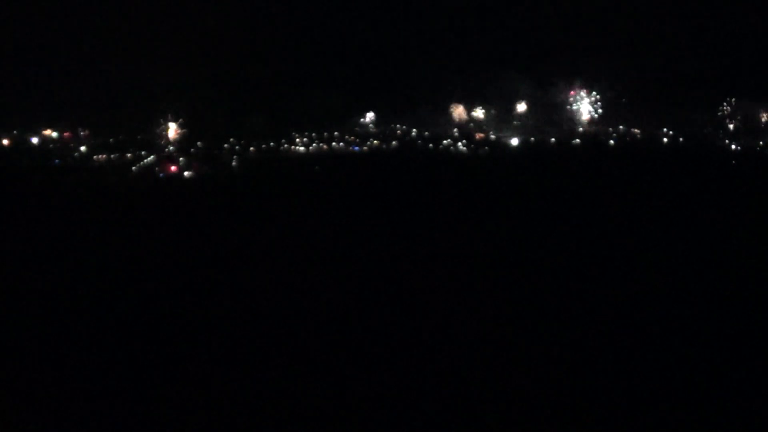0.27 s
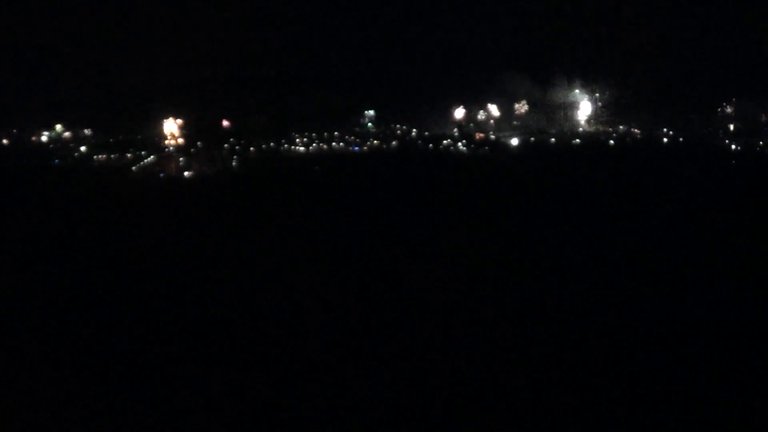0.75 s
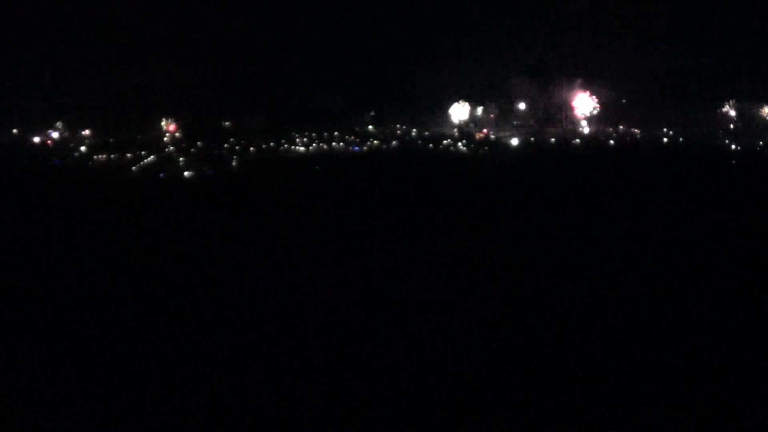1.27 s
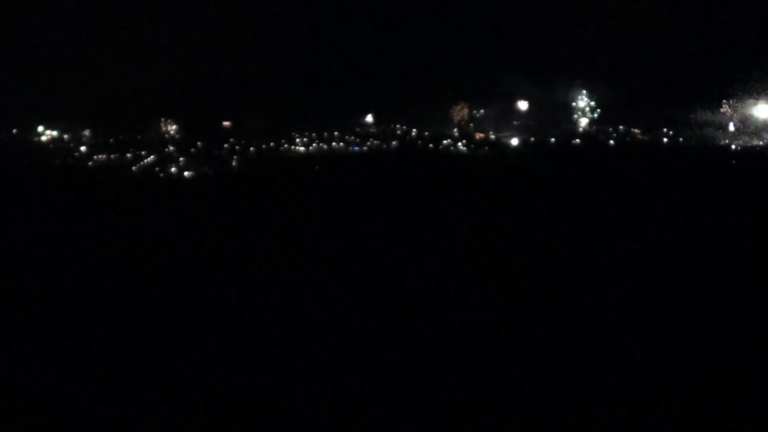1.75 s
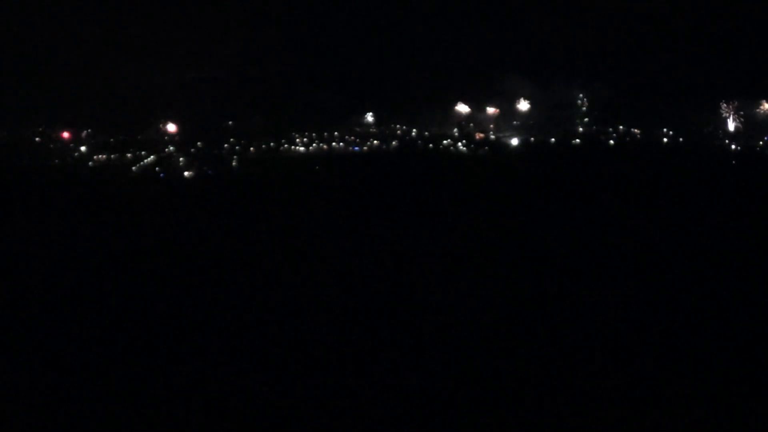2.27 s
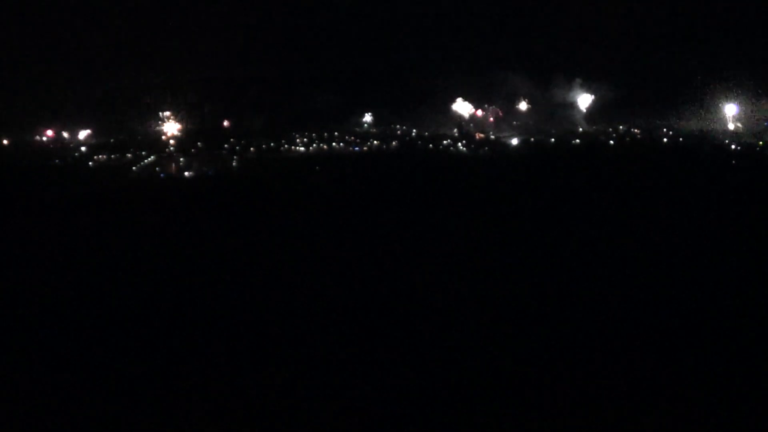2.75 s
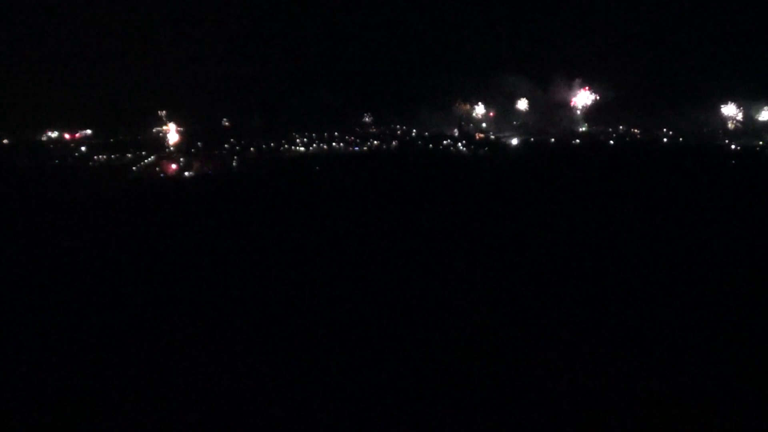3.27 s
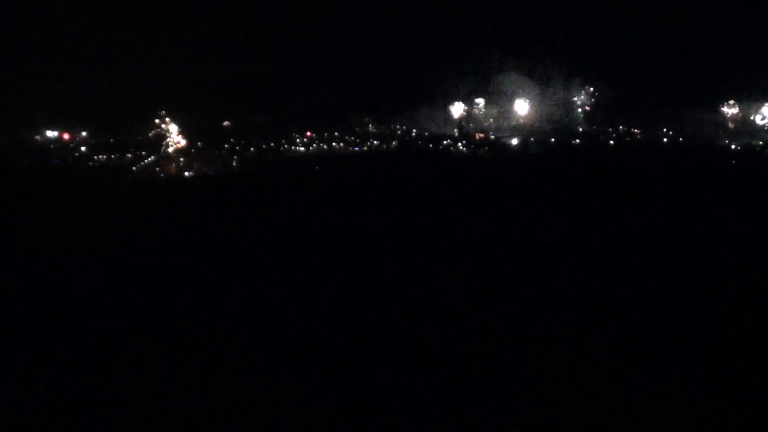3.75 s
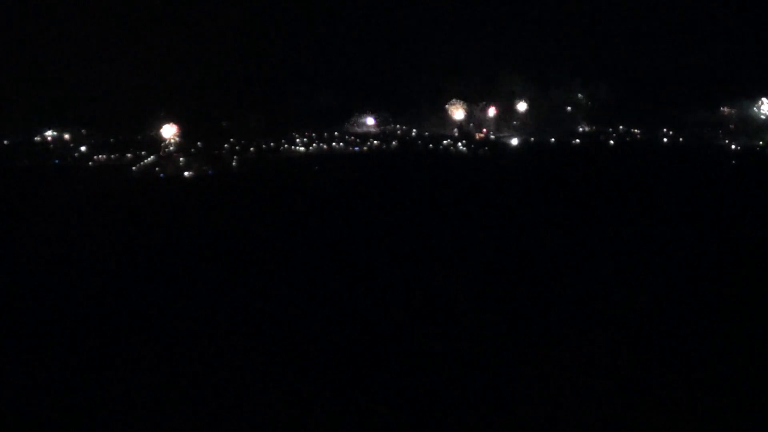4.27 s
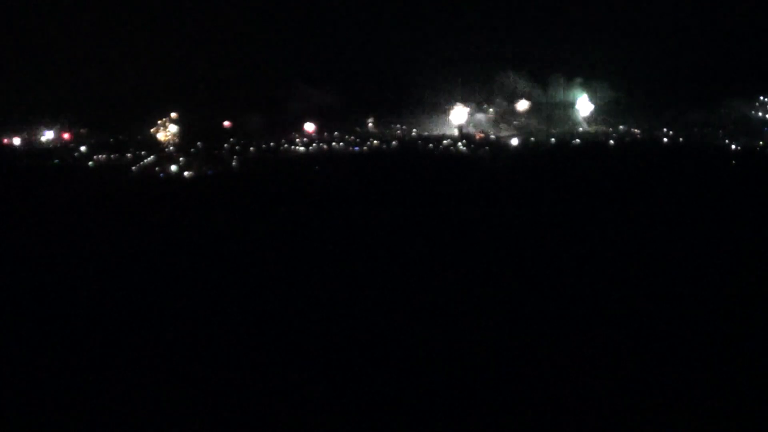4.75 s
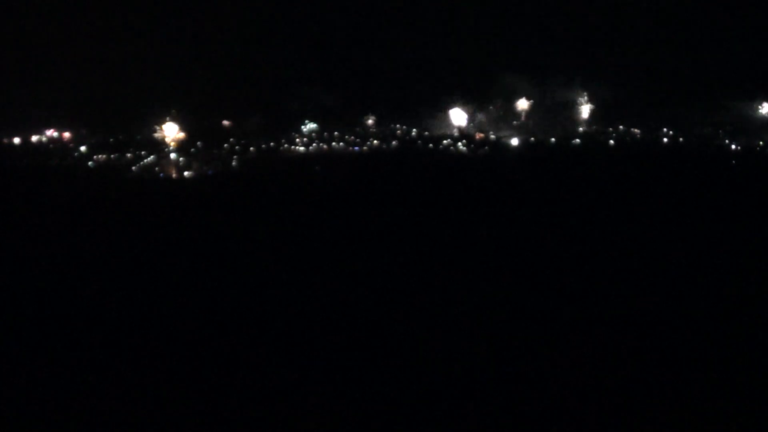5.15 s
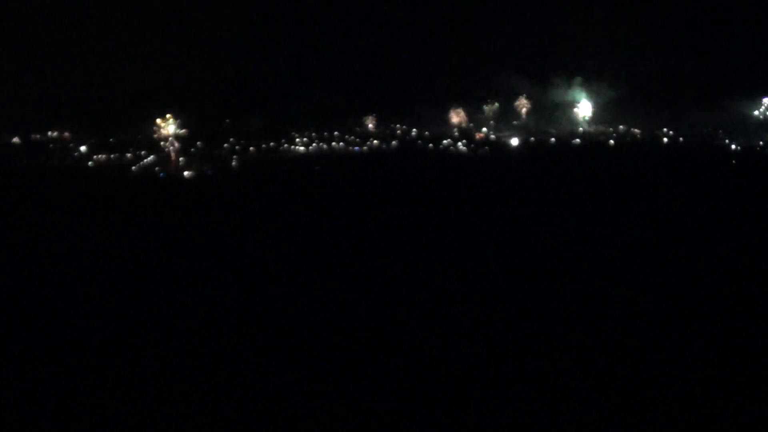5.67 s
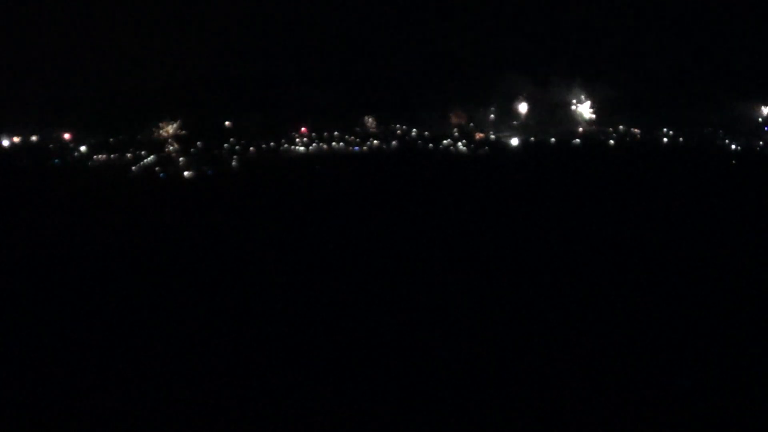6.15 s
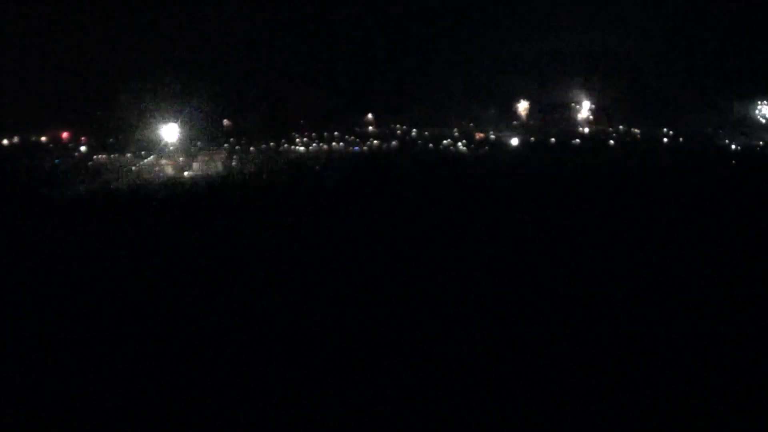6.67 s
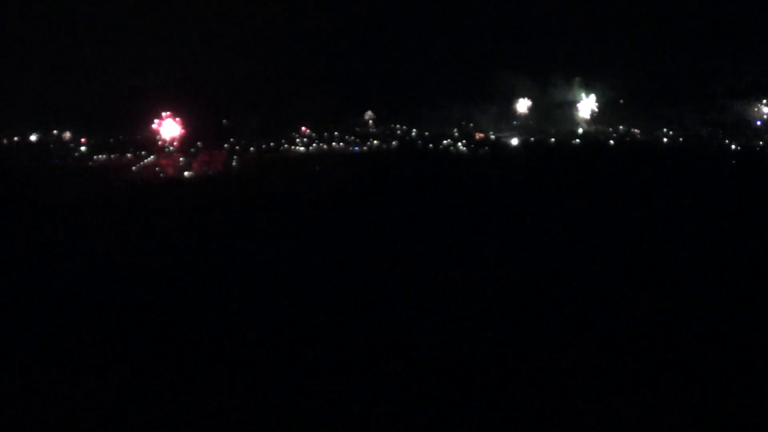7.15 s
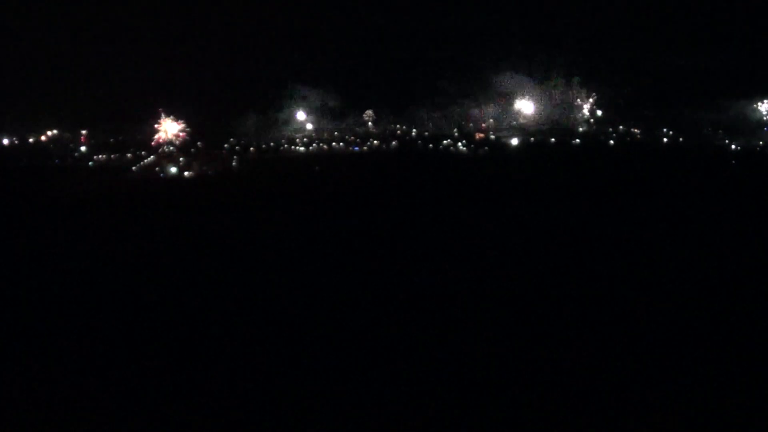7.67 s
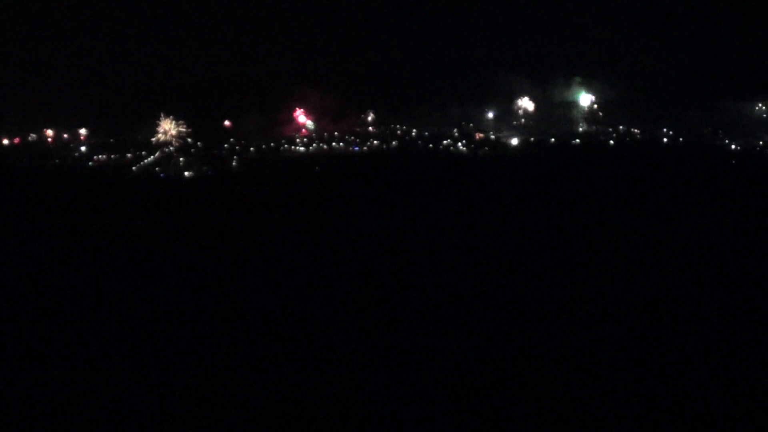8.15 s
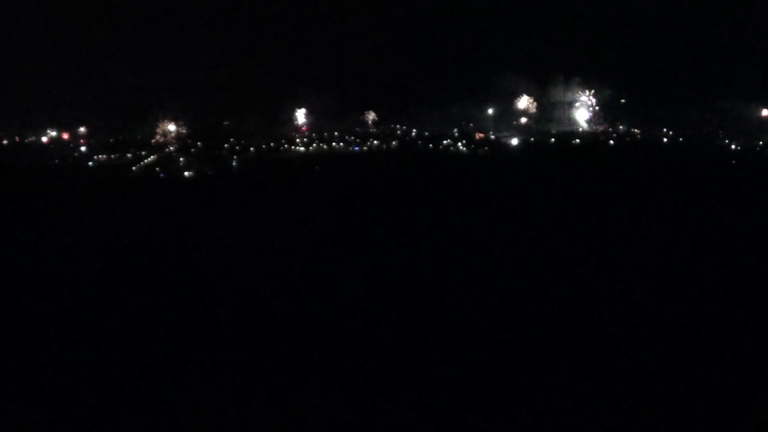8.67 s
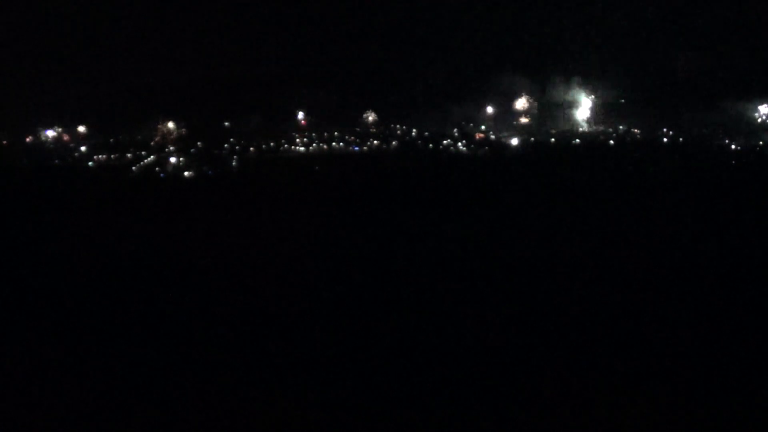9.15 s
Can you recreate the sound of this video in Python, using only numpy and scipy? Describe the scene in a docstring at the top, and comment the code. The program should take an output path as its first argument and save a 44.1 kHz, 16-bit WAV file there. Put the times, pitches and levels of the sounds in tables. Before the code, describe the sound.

Outdoors at night, fireworks go off all over a distant town without pause. Sharp nearer cracks with short, hollow thumps mix with duller thuds from farther off, several dozen every few seconds, irregularly clustered and spread left and right. Brief echoes from ground and walls blur them together. Behind lies a murmur of far pops and patches of crackle. A small stereo camera adds light hiss and a thin high whine, ducking after loud bangs.

```python
"""Bangs of fireworks, each a short crack and a two-cycle thump with echoes, burst all over a distant town.
A pulse with the spectrum of a shock front makes the crack, a windowed cosine the thump, sparse taps the echoes.
Behind them far pops and crackle, swarms of random filtered clicks, merge into a bed.
A small stereo camera adds noise as hiss and a sine as whine; its limiter ducks both after each loud bang."""
import sys
import numpy as np
from scipy import signal
from scipy.fft import next_fast_len
from scipy.io import wavfile

SR = 44100
rng = np.random.default_rng(int(sys.argv[2]) if len(sys.argv) > 2 else 0)


def log_audio(samples):
    """Write samples as a 16-bit WAV file to the path given in sys.argv[1]."""
    # one column per channel
    frames = np.atleast_2d(samples).T
    # limit to full scale, then quantise
    limited = np.clip(frames, -1, 1)
    pcm = np.round(limited * 32767).astype(np.int16)
    wavfile.write(sys.argv[1], SR, pcm)


N = 414981  # length in samples

# Places of the bursts. Each: crack peak relative to the thump in dB, left minus right in dB before widening.
NEAR, NEAR_L, NEAR_R = (-11, -4.5), (-8.5, 1.7), (-9, -9)
MID, MID_L, MID_R = (-16, -4), (-20, 1), (-13.5, -7)
OUT, OUT_L = (-21, -4), (-22.5, 1.5)
FAR, FAR_L, EDGE = (-22, -2.5), (-44.5, 2.5), (-48, -1.9)
# Bangs, before echoes and limiter. Each row: start in seconds, thump peak in dB, thump pitch in Hz, place.
BANGS = [(0.0248, -7.5, 402, FAR_L), (.0292, -12, 356, FAR), (0.0547, -7.5, 444, NEAR),
         (0.0798, -10.5, 365, OUT_L), (0.15, -4.5, 412, NEAR), (.165, -5, 490, NEAR_R),
         (.1984, -2, 387, NEAR), (0.2031, -14, 490, NEAR_R), (0.2143, -1.5, 485, MID),
         (.2629, -11.5, 463, OUT), (.267, -7.5, 424, FAR), (0.2724, -9, 368, FAR), (.2832, -5, 360, NEAR),
         (.2936, -11.5, 400, EDGE), (0.3009, -1, 422, MID), (.346, -2.5, 463, MID),
         (0.3671, -4.5, 540, NEAR), (0.3767, -2, 485, MID), (.402, -19, 353, NEAR),
         (0.4051, -7.5, 310, MID_L), (0.4239, -7, 570, NEAR_R), (0.4307, -10, 416, OUT_L),
         (.5064, -14, 385, OUT_L), (.5388, -13.5, 347, EDGE), (0.5523, -7.5, 415, FAR_L),
         (.5737, -10, 474, OUT), (.5823, -14, 405, FAR), (0.5949, -2, 460, MID), (0.6227, -15, 318, FAR),
         (0.6458, -5, 490, MID), (0.7123, -7.5, 470, MID), (.7687, -9, 428, FAR), (0.7708, -8, 410, OUT),
         (0.7856, -2, 488, MID), (0.888, -1.5, 400, NEAR_L), (0.9384, 2, 366, MID),
         (0.9979, -10.5, 437, OUT_L), (1.0034, -4.5, 419, MID), (1.006, -10, 346, MID),
         (1.109, -8, 323, MID_L), (1.137, -18, 450, OUT), (1.1847, -4.5, 354, NEAR_L),
         (1.1968, -10.5, 378, NEAR_R), (1.21, -16, 373, MID_L), (1.2217, -17, 347, MID_L),
         (1.2529, -12, 357, FAR), (1.2627, -3.5, 433, FAR_L), (1.265, -2.5, 347, EDGE),
         (1.3664, -5.5, 510, NEAR_R), (1.4095, -1, 232, NEAR), (1.4245, -5, 258, FAR),
         (1.467, -13, 473, NEAR_R), (1.5084, -7, 353, OUT_L), (1.56, -7, 410, FAR_L),
         (1.5971, -5.5, 484, NEAR), (1.6115, -5.5, 517, OUT), (1.63, -2, 306, NEAR),
         (1.6353, -6.5, 330, FAR), (1.6928, -6, 400, OUT_L), (1.725, -17.5, 426, NEAR_R),
         (1.798, -11.5, 365, FAR), (1.8014, -4, 370, OUT), (1.8053, -12, 413, NEAR_R),
         (1.8213, -3, 376, FAR_L), (1.8354, -6.5, 350, EDGE), (1.8421, -13.5, 423, FAR),
         (2.0406, -1, 392, MID), (2.236, -19.5, 457, OUT), (2.2789, -5.5, 425, NEAR_R),
         (2.3464, 0, 340, FAR_L), (2.3533, 1, 413, OUT), (2.375, -4, 390, NEAR_L), (2.378, -14, 268, MID),
         (2.4459, -8, 390, OUT_L), (2.5208, -12, 380, OUT_L), (2.6312, -7.5, 430, NEAR),
         (2.6537, -6.5, 335, NEAR), (2.735, -3, 340, MID_L), (2.7774, -11.5, 480, NEAR),
         (2.7966, -3.5, 435, MID), (2.8209, -5, 467, MID), (2.9202, -4.5, 430, NEAR),
         (2.9235, -16, 295, FAR), (2.9323, -8, 264, OUT), (2.9455, -15, 340, MID_L),
         (2.9551, -15.5, 390, FAR), (2.9889, -0.5, 465, NEAR), (3.0524, -9, 334, FAR),
         (3.135, -4, 390, MID), (3.2132, -4.5, 412, OUT), (3.2152, -1.5, 398, MID), (3.234, -18, 397, FAR),
         (3.2564, -12, 510, NEAR_R), (3.347, -19, 327, FAR), (3.4491, -10.5, 382, MID_L),
         (3.487, -12, 418, NEAR), (3.5527, -5.5, 306, FAR), (3.5912, -7, 505, NEAR_R),
         (3.6078, -5.5, 304, EDGE), (3.6242, -9.5, 436, NEAR), (3.657, -4, 373, MID), (3.67, -4, 372, FAR),
         (3.7727, -10.5, 394, OUT_L), (3.7997, -11.5, 510, NEAR_R), (3.8101, -13, 390, NEAR_R),
         (3.833, -3.5, 392, OUT_L), (3.9512, -9, 375, EDGE), (3.955, 1, 355, FAR_L),
         (3.971, -12, 495, NEAR_R), (4.0423, -15, 430, EDGE), (4.091, -5.5, 498, MID),
         (4.1123, -5, 393, OUT_L), (4.171, -9, 357, EDGE), (4.202, -1, 283, NEAR),
         (4.2134, -10.5, 236, FAR), (4.2259, -1, 312, NEAR), (4.3225, -4, 398, NEAR),
         (4.3337, -2.5, 550, MID_R), (4.3471, -3, 395, EDGE), (4.3549, -0.5, 415, NEAR_L),
         (4.3827, -13.5, 360, MID_L), (4.395, -3, 416, MID), (4.4153, -3, 407, OUT_L),
         (4.543, -4.5, 487, NEAR_R), (4.594, 1, 362, OUT), (4.678, -15, 430, OUT), (4.7111, -8, 272, FAR),
         (4.716, -8, 312, MID), (4.7225, -2.5, 294, MID), (4.7254, -1.5, 460, MID),
         (5.0255, -9, 312, FAR_L), (5.0714, -14, 373, OUT_L), (5.105, -8, 415, NEAR_R),
         (5.121, -21, 385, MID), (5.23, -0.5, 378, NEAR_L), (5.3152, -5.5, 334, EDGE),
         (5.3575, -.5, 476, MID), (5.3755, -7.5, 405, FAR_L), (5.5574, -15, 292, OUT_L),
         (5.636, -11.5, 392, OUT_L), (5.6471, -13, 443, FAR_L), (5.6546, -4, 313, NEAR),
         (5.732, -5.5, 480, NEAR_R), (5.8586, -13, 320, EDGE), (5.8813, -11, 355, FAR_L),
         (5.929, -13.5, 362, FAR), (6.0196, -7.5, 424, MID), (6.0646, 4, 260, NEAR),
         (6.0793, -6.5, 280, OUT), (6.0904, -5, 320, FAR), (6.104, 2.5, 420, MID), (6.1743, 3, 460, OUT),
         (6.1798, -2.5, 405, OUT), (6.1805, -6.5, 285, OUT), (6.2026, -3, 403, NEAR_L),
         (6.3554, -13.5, 396, MID_L), (6.381, -6.5, 351, EDGE), (6.4129, -10, 386, OUT),
         (6.473, -4.5, 475, NEAR_R), (6.4819, -13.5, 332, MID), (6.4854, -8, 246, MID_R),
         (6.4888, -12.5, 470, NEAR_R), (6.649, -5, 336, NEAR), (6.672, -6, 450, NEAR_R),
         (6.68, 1, 361, EDGE), (6.687, -6, 373, FAR), (6.7307, -13, 575, MID_L),
         (6.7416, -8.5, 443, NEAR_R), (6.762, -9, 414, NEAR_R), (6.7666, -13, 442, MID_R),
         (6.807, -21, 400, FAR), (6.859, -5.5, 390, NEAR), (6.8726, -13.5, 401, OUT),
         (6.968, -19.5, 400, FAR), (6.991, -10.5, 279, MID), (7.0184, -0.5, 340, MID),
         (7.0234, -4.5, 393, NEAR_L), (7.0292, -7, 470, FAR_L), (7.045, -14, 393, NEAR_L),
         (7.0924, -12, 400, MID_L), (7.1339, -0.5, 486, MID), (7.2636, -5.5, 400, OUT_L),
         (7.332, -6.5, 406, MID), (7.3363, -9, 240, EDGE), (7.3507, -1, 510, MID), (7.3883, -0.5, 440, FAR),
         (7.6448, 1, 313, OUT), (7.6556, -8, 354, FAR), (7.673, -4.5, 490, NEAR_R),
         (7.7402, -19.5, 397, FAR_L), (7.754, -6.5, 458, MID), (7.8034, -0.5, 406, OUT),
         (7.8741, -2, 425, FAR_L), (7.8877, -7, 297, NEAR_R), (7.9, -2, 317, EDGE), (7.9482, -11, 334, FAR),
         (7.967, -6.5, 352, EDGE), (7.973, -8, 497, NEAR), (8.07, -17.5, 415, FAR), (8.199, -17, 377, OUT),
         (8.276, 2.5, 340, OUT), (8.3468, -6, 478, NEAR), (8.353, -3.5, 353, MID), (8.3566, -16, 270, MID),
         (8.4602, -15, 457, EDGE), (8.472, -16.5, 427, FAR), (8.487, -19.5, 380, FAR),
         (8.5644, -11, 420, NEAR), (8.6511, -5, 454, NEAR), (8.694, -3.5, 278, OUT),
         (8.6962, -5.5, 380, MID), (8.7332, -11.5, 397, FAR_L), (8.7681, -2.5, 483, NEAR_R),
         (8.7837, -14, 362, MID_R), (8.8659, 0, 357, NEAR_L), (8.869, -11, 228, MID_R),
         (8.899, -9, 493, FAR), (8.9057, 1, 392, NEAR_L), (8.91, -4.5, 403, NEAR_L),
         (8.9129, -7.5, 268, OUT), (8.9233, -12, 423, MID_R), (8.9868, -12, 402, OUT_L),
         (9.0171, -1.5, 370, NEAR_L), (9.022, -14, 365, OUT), (9.046, -2, 367, MID),
         (9.0501, -2, 364, OUT_L), (9.0582, -16, 326, FAR), (9.0976, -2, 446, MID),
         (9.1502, -12, 507, NEAR), (9.162, 2.5, 342, NEAR_L), (9.1669, -12, 293, NEAR),
         (9.18, -11.5, 427, MID_R), (9.266, -8.5, 322, FAR), (9.3422, -1.5, 318, MID),
         (9.3542, -14.5, 460, OUT), (9.3557, -5.5, 447, MID_R)]
# Relative spectrum of a crack before air loss. Each row: frequency in Hz, level in dB.
CRACK_SPECTRUM = [(300, -24), (750, 5.5), (1200, -5), (1800, 2), (3000, 1), (5000, -2.5), (8000, -17)]
# Relative spectrum of the steep edge of a near bang. Each row: frequency in Hz, level in dB.
FRONT_SPECTRUM = [(2000, -16), (4500, -3), (10000, -9), (16000, -35)]
# Single echoes off ground and walls. Each row: delay in seconds, level in dB.
ECHOES = [(0.0093, -23), (0.017, -27.5)]
# Relative spectrum of a far pop. Each row: frequency in Hz, level in dB.
POP_SPECTRUM = [(24, -84), (40, -63), (108, -5.5), (217, 6.5), (361, 8.5), (781, -2), (1080, -14.5),
                (1300, -15), (1690, -13.5), (2860, -120)]
# Course of the far pops before the low cut and limiter. Each row: time in seconds, level in dB.
FAR_POPS = [(0, -34), (.5, -34), (1.65, -34), (1.9, -38.5), (2.2, -35), (3.64, -35.5), (4.05, -38.5),
            (4.65, -33), (4.85, -35), (5.998, -37), (7.2, -36.5), (7.5, -37.5), (8.2, -35), (8.5, -41),
            (9.0, -26), (9.41, -33.5)]
# Relative spectrum of far crackle. Each row: frequency in Hz, level in dB.
CRACKLE_SPECTRUM = [(530, -39.5), (900, -1), (1080, -3.5), (1670, -0.5), (2600, -7), (3320, -25),
                    (5000, -47), (6500, -54), (11000, -120)]
# Far crackling shells. Each row: time when loudest in seconds, level in dB before clumping, burning time in seconds.
CRACKLERS = [(0.0, -49, 0.19), (.68, -48, 0.074), (.95, -48.5, 0.34), (2.07, -45.5, 0.14),
             (2.45, -49.5, .35), (3.33, -50, 0.22), (3.55, -51.5, 0.36), (4.3, -59, 0.17),
             (4.62, -46.5, 0.44), (5.27, -52, 0.32), (6.2, -50, .4), (7.1, -48.5, 1), (7.85, -50, 0.58),
             (8.92, -46, 0.38)]
# Relative spectrum of the circuit hiss. Each row: frequency in Hz, density in dB per Hz.
HISS_SPECTRUM = [(2000, 7), (5000, -3), (15000, -6.5)]
# Share of the hiss that differs left and right. Each row: frequency in Hz, level in dB.
HISS_APART = [(3000, -4.5), (8000, -10.5), (14000, -30)]

SAG_DB = -4.5  # the stars of a shell thin out by this much while they burn
CATCH_S, DIE_S = 0.046, 0.065  # Gaussian widths of catching and dying
CLUMP_HZ, CLUMP_DB = 15, 1.3
HISS_DB, WHINE_DB, WHINE_HZ = -58, -73.5, 15625  # RMS levels ahead of the limiter
LOW_CUT_HZ, EDGE_HZ = 149.5, 15800  # band limits
LIMIT_DB, RECOVER_S = -8.5, 0.017  # threshold; time constant of the recovery


def bangs():
    """Shock propagation: a steep front arrives as a crack and the thump follows; rows are sum and difference."""
    out = np.zeros((2, N))
    t = np.arange(-200, 900) / SR
    front = causal(FRONT_SPECTRUM)
    front = -front[:400] / abs(front).max()
    # roofs and ground near the burst scatter each crack over a few milliseconds, otherwise at each microphone
    after_s = np.arange(500) / SR
    scatter = 0.063 * rng.standard_normal((len(BANGS), 2, len(after_s))) * np.exp(-after_s / 0.0027)
    for (s, db, hz, (crack_db, pan_db)), late in zip(BANGS, scatter):
        near_db = db + crack_db
        both = np.array([[1], [lean(pan_db)]])
        thump = gain_of(db) * wavelet(t * hz, centre=0.671, before=0.37, after=0.63)
        add(out, s + t[0], both * thump)
        # faint cracks are far and dull
        crack = -causal(CRACK_SPECTRUM, air_hz=6500 * gain_of(0.4 * near_db))[:len(front)]
        crack *= gain_of(near_db) / abs(crack).max()
        edge = gain_of(4.2 * near_db - 3) * front  # steepens strongly with level
        add(out, s - 0.0004, both * (crack + edge))
        scattered = signal.fftconvolve(late * [[1], [0.4]], crack[None], axes=1)
        add(out, s + 0.00028, scattered)
    return out


def wavelet(turns, centre, before, after):
    """Windowed oscillation: a trough at the centre with a swing on each side; times in cycles."""
    u = turns - centre
    width = np.where(u < 0, before, after)
    return -np.cos(2 * np.pi * u) * np.exp(-(u / width) ** 2)


def town(x, t60, start_s):
    """Reverberation: single echoes and a sparse, exponentially decaying tail of taps with random sign."""
    t = np.arange(SR // 2) / SR
    sign = rng.choice([-1., 1.], (2, len(t)))
    present = rng.random((2, len(t))) < 0.04
    taps = sign * present * gain_of(-60 * t / t60) * (t > start_s)
    taps -= 0.56 * smooth(taps, 600)  # walls and roofs throw back the crack more than the thump
    taps = smooth(taps, 3900)  # the longer way through the air dulls them
    taps *= gain_of(-18.0) / np.linalg.norm(taps[0])
    for s, db in ECHOES:
        taps[:, round(s * SR)] += gain_of(db)
    return signal.oaconvolve(x, taps, axes=1)[:, :N]


def swarm(colour, per_s, spread_db, pan_db):
    """Shot noise: random clicks of uneven size from many sides, coloured by distance."""
    size_db = spread_db * np.minimum(rng.exponential(1, N), 4)
    size = gain_of(size_db) * (rng.random(N) < per_s / SR)
    size *= rng.choice([-1., 1.], N)
    clicks = size * np.array([np.ones(N), lean(rng.uniform(*pan_db, N))])
    out = signal.oaconvolve(clicks, causal(colour)[None], axes=1)[:, :N]
    return out / np.sqrt(np.mean(out[0] ** 2))


def burning():
    """Incoherent addition: the powers of the crackling shells add; returns the gain of the far crackle."""
    t = np.arange(N) / SR
    power = np.zeros(N)
    for s, db, burn_s in CRACKLERS:
        u = t - s
        catching = (np.minimum(u, 0) / CATCH_S) ** 2
        dying = (np.maximum(u - burn_s, 0) / DIE_S) ** 2
        sagging_db = db + SAG_DB * np.clip(u / burn_s, 0, 1)
        power += (gain_of(sagging_db) * np.exp(-catching - dying)) ** 2
    clumps = evened(smooth(smooth(rng.standard_normal(N), CLUMP_HZ), CLUMP_HZ))  # stars go off in clumps
    return np.sqrt(power) * gain_of(CLUMP_DB * clumps)


def camera():
    """Circuit noise: filtered hiss, nearly the same in both channels, and a thin steady sine whine."""
    a, b = signal.oaconvolve(rng.standard_normal((2, N)), causal(HISS_SPECTRUM)[None], axes=1)[:, :N]
    apart = signal.oaconvolve(evened(b), causal(HISS_APART))[:N]
    hiss = gain_of(HISS_DB) * (evened(a) + np.outer([1, -1], apart))
    whine = gain_of(WHINE_DB) * np.sqrt(2) * np.sin(2 * np.pi * WHINE_HZ * np.arange(N) / SR)
    return hiss + whine


def causal(points, air_hz=1e6):
    """Minimum phase: the shortest pulse with this spectrum; air loss grows as frequency squared, 20 dB at air_hz."""
    hz = abs(np.fft.fftfreq(4096, 1 / SR))
    level_db = read(points, hz) - 20 * (hz / air_hz) ** 2
    log_gain = np.log(gain_of(np.maximum(level_db, -100)))
    spectrum = np.exp(np.conj(signal.hilbert(log_gain)))  # the Hilbert transform gives the phase
    return np.fft.ifft(spectrum).real[:2048]


def read(points, hz):
    """Interpolation of a spectrum along logarithmic frequency."""
    f, value = np.transpose(points)
    return np.interp(np.log(hz + 1), np.log(f + 1), value)


def lean(pan_db):
    """Level difference: share of a sound that goes to the difference of the two microphones."""
    return np.tanh(-pan_db * np.log(10) / 40)


def smooth(x, hz):
    """First-order low-pass: exponential relaxation towards the input."""
    r = np.exp(-2 * np.pi * hz / SR)
    return signal.lfilter([1 - r], [1, -r], x)


def gain_of(db):
    """Decibel law: amplitude ratio of a level."""
    return 10 ** (np.asarray(db) / 20)


def evened(x):
    """Normalization to unit RMS."""
    return x / np.sqrt(np.mean(x ** 2) + 1e-20)


def add(mix, s, sound):
    """Superposition: adds a sound to the mix from s seconds on, or from the beginning if s is negative."""
    part = mix[:, max(round(s * SR), 0):][:, :sound.shape[1]]
    part += sound[:, :part.shape[1]]


def scene():
    """Superposition of bangs, echoes, pops and crackle as sum and difference, then left and right with camera noise."""
    near = bangs()
    pops = swarm(POP_SPECTRUM, per_s=800, spread_db=4.5, pan_db=(-7, 3))
    pops = pops * gain_of(np.interp(np.arange(N) / SR, *np.transpose(FAR_POPS)))
    crackle = burning() * swarm(CRACKLE_SPECTRUM, per_s=2500, spread_db=4.5, pan_db=(-12, 12))
    mid, side = near + town(near, t60=0.62, start_s=0.0021) + pops + crackle
    # the pair tells the sides apart best in the bass; the right microphone has more deep bass, less treble
    side = 0.27 * smooth(side, 420) + 0.74 * side + 0.68 * smooth(mid, 286) - 0.2 * mid
    low_cut = signal.butter(2, LOW_CUT_HZ, "high", fs=SR, output="sos")
    air = signal.sosfilt(low_cut, [mid - side, mid + side])
    return air + camera()


def record(dry):
    """Gain control: a limiter looks a little ahead, falls quickly and creeps back; then the band limit."""
    ahead_s, out_db = 0.0015, 3.2
    envelope = abs(signal.hilbert(dry.mean(0), next_fast_len(N))[:N])
    peak_db = 20 * np.log10(envelope + 1e-9)
    fade = np.arange(N) / SR / RECOVER_S
    # each excess over the threshold holds, decaying exponentially, until a greater one replaces it
    log_over = np.log(np.maximum(peak_db - LIMIT_DB, 1e-9))
    over_db = np.exp(np.maximum.accumulate(log_over + fade) - fade)
    over_db = np.interp(fade + ahead_s / RECOVER_S, fade, over_db)
    quick_db = smooth(over_db, 270)
    lasting_db = 1.2 * smooth(over_db, 0.21)  # a run of bangs keeps the gain a little low
    held = dry * gain_of(out_db - quick_db - lasting_db)
    band_limit = signal.firwin(511, EDGE_HZ, window=("kaiser", 9), fs=SR)
    return signal.oaconvolve(held, band_limit[None], "same")


dry = scene()
out = record(dry)
log_audio(out)
```